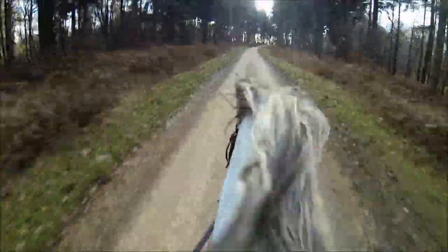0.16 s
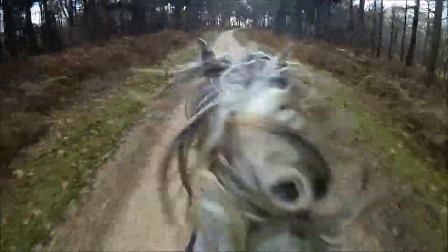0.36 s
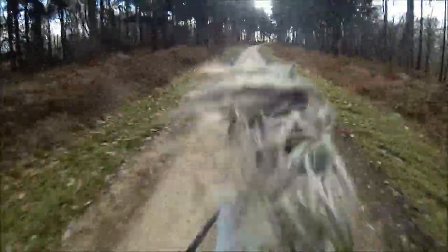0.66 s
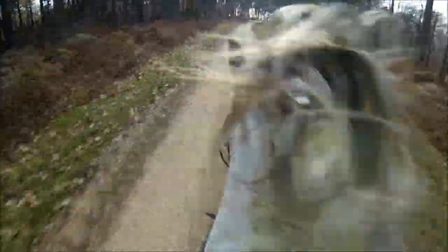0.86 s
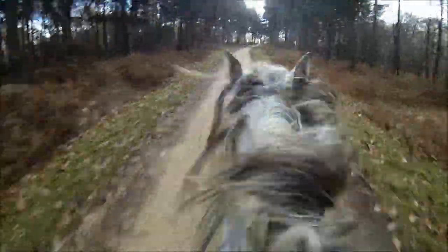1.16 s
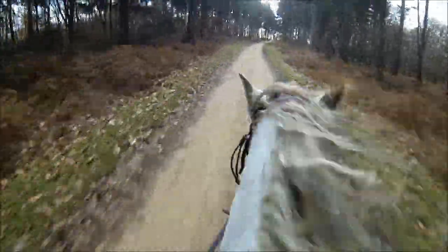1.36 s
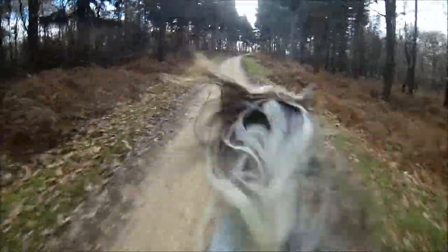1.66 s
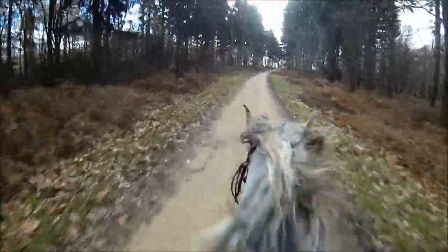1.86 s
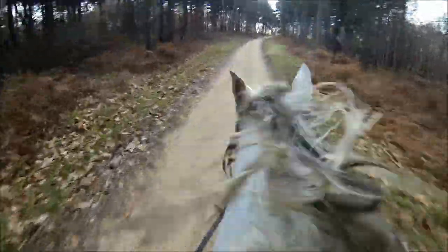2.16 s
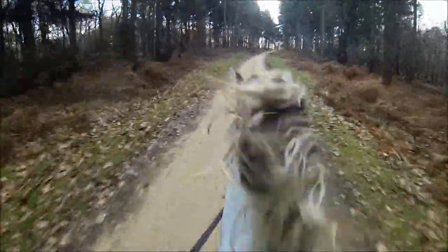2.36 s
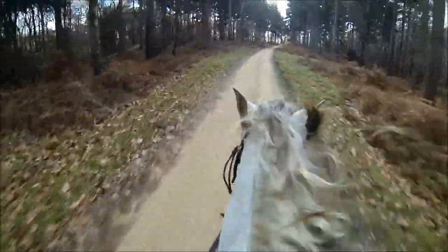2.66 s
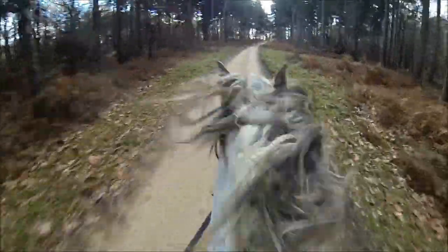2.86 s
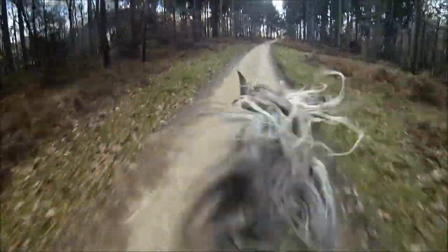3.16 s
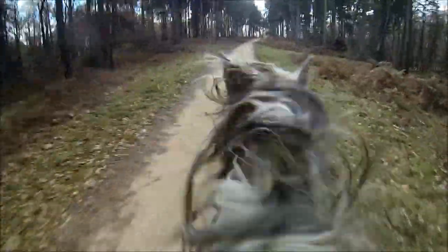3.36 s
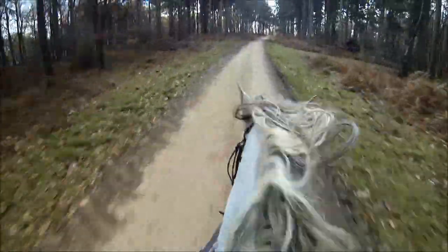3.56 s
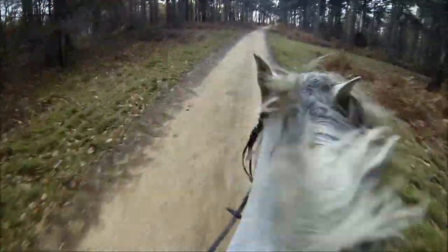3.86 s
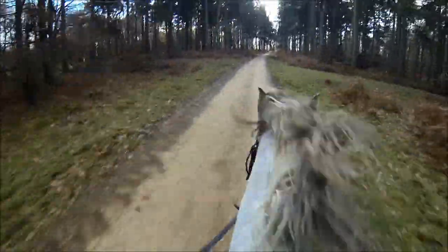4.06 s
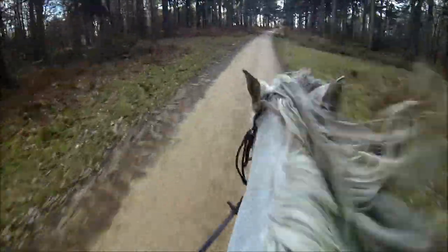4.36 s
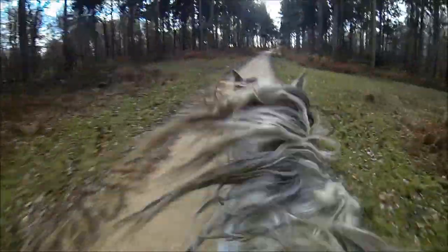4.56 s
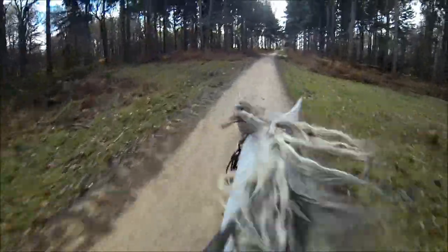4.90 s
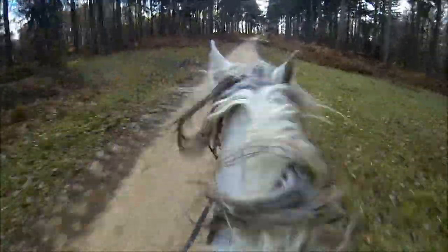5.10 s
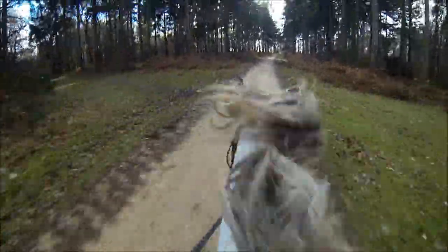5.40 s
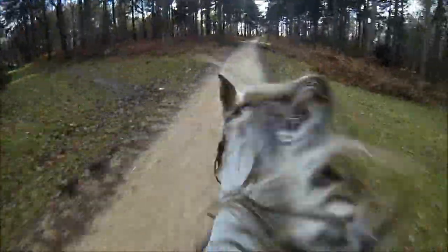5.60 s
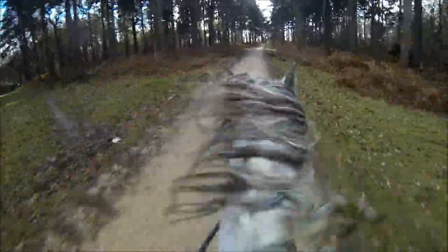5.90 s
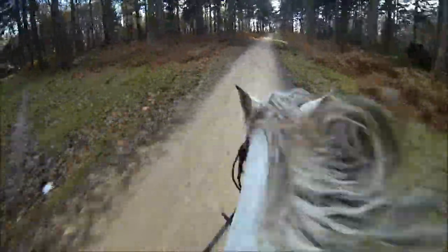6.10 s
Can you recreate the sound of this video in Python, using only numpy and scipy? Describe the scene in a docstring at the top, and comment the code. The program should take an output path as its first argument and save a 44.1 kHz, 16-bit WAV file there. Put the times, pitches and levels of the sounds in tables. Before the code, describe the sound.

From the saddle of a cantering horse on an open gravel forest track: about 2.3 strides a second, each with two softer scuffing hind hooves followed by two hard, dry fore clops. Stones crack and pebbles tick around them, tack clicks once per stride, and low wind rumble continually thumps the exposed microphone, rushing and hissing in gusts that swell with the rider's swing.

```python
"""On a gravel forest track, from the saddle of a cantering horse, about 2.3 strides a second, microphone in the wind.
From the start the wind buffets, rushes and hisses (shaped noise) over a faint floor, a pitched rattle and fine crackle.
Each stride below brings two scuffing hind hooves, then two hard fore clops (damped resonances with grit bursts).
As the first fore hoof lands a thump comes up through the saddle; the wind swells with the rider's swing, tack clicks.
Throughout, stones turn over, pebbles tick, and single gusts and eddies catch the microphone."""
import sys
import numpy as np
from scipy import signal
from scipy.fft import rfft, irfft, next_fast_len
from scipy.io import wavfile
from scipy.ndimage import uniform_filter1d

SR = 44100
rng = np.random.default_rng(int(sys.argv[2]) if len(sys.argv) > 2 else 0)


def dump_mix(stems):
    """Bounce the given channels to the path in sys.argv[1] as a 16-bit WAV at rate SR."""
    frames = np.atleast_2d(stems).T  # one column per channel
    limited = np.clip(frames, -1, 1)  # hard clip at full scale
    pcm = np.round(limited * 32767).astype(np.int16)
    wavfile.write(sys.argv[1], SR, pcm)


N = 275184
STEP = np.arange(4096) / SR  # time within one short sound (s)
CLOCK = np.arange(N) / SR  # time within the scene (s)

# Levels called "before trim" get a fixed offset in the function that plays them.
# Burst levels refer to the fixed span given to burst_one().

# steady airflow of the ride, before trim: (time [s], buffeting [dB], rush [dB], hiss [dB])
AIRFLOW = [(0.0, -18, -30, -43.5), (0.25, -20.5, -34, -45), (0.55, -20.5, -38.5, -67.5),
           (1.0, -12.5, -26.5, -39.5), (1.33, -17, -33, -47), (1.5, -20.5, -33.5, -52),
           (1.9, -17.5, -30, -49.5), (2.15, -17.5, -32.5, -47.5), (2.7, -17.5, -33, -49),
           (3.15, -15.5, -27, -42.5), (3.4, -18.5, -40.5, -54.5), (3.68, -23.5, -33, -48),
           (3.92, -19, -36.5, -56.5), (4.1, -36.5, -34, -55), (4.55, -17, -32.5, -49.5),
           (4.835, -18.5, -41, -59.5), (5.08, -24.5, -37.5, -57), (5.45, -19.5, -36, -55),
           (6.24, -22.5, -36.5, -57.5)]
# single gusts at the microphone, before trim and stretch:
# (crest time [s], length [s], buffeting [dB], rush [dB], hiss [dB])
GUSTS = [(0.067, 0.046, -10, -28, -51), (0.188, 0.073, -12, -29.5, -44), (0.351, 0.036, -8.5, -22.5, -35.5),
         (0.423, 0.057, -11.5, -22.5, -35), (0.571, 0.16, -12, -24.5, -37), (0.718, 0.031, -10, -20, -32),
         (0.785, 0.04, -14, -26.5, -32.5), (0.817, 0.021, -12, -17, -24.5), (0.83, 0.013, -6, -13, -18),
         (0.845, 0.035, -14, -26.5, -39), (0.881, 0.022, -16, -21, -30.5), (0.962, 0.043, -25, -19, -32.5),
         (1.067, 0.026, -8, -21.5, -39), (1.195, 0.011, -21, -20.5, -17), (1.205, 0.075, -10.5, -20, -32.5),
         (1.277, 0.029, -14, -28, -34.5), (1.341, 0.072, -28, -21, -37.5), (1.54, 0.037, -14.5, -37, -44),
         (1.618, 0.015, -34, -21.5, -37), (1.653, 0.018, -16.5, -49, -58), (1.76, 0.026, -12.5, -21, -30),
         (2.142, 0.03, -26, -37.5, -54), (2.217, 0.026, -12, -23, -33), (2.239, 0.033, -21, -20.5, -31.5),
         (2.372, 0.016, -13, -16.5, -38), (2.43, 0.037, -14.5, -29.5, -48), (2.522, 0.024, -19, -27.5, -59),
         (2.605, 0.042, -27, -24.5, -33.5), (2.664, 0.03, -14.5, -47, -60), (2.708, 0.051, -15.5, -35, -62),
         (2.896, 0.038, -32, -21, -40), (2.998, 0.078, -31, -26.5, -36.5), (3.067, 0.05, -15, -43, -53),
         (3.186, 0.041, -13, -36, -47), (3.267, 0.076, -12.5, -24.5, -36), (3.36, 0.079, -24, -29.5, -43),
         (3.453, 0.031, -10, -20.5, -34), (3.544, 0.081, -15, -27, -45), (3.803, 0.039, -17, -45, -56),
         (3.88, 0.047, -25, -27.5, -40), (3.964, 0.052, -16.5, -24.5, -40), (4.247, 0.063, -20.5, -38, -52),
         (4.319, 0.017, -18, -21, -34), (4.392, 0.01, -19, -23, -43), (4.688, 0.048, -29, -24.5, -39),
         (4.74, 0.078, -17.5, -24.5, -35), (4.976, 0.047, -21, -25, -39), (5.21, 0.04, -22, -30, -50),
         (5.232, 0.13, -19, -25.5, -36.5), (5.32, 0.056, -18, -29, -45), (5.479, 0.039, -10.5, -29.5, -36),
         (5.54, 0.071, -18, -28, -36), (5.624, 0.023, -21, -23, -35.5), (5.694, 0.052, -30, -25.5, -39.5),
         (5.734, .03, -13.5, -52, -57), (5.854, 0.065, -14, -43, -64), (6.073, 0.12, -17.5, -29.5, -37.5),
         (6.172, 0.031, -20, -24.5, -57)]
GUST_BUILD, GUST_BREAK = 0.89, 0.76  # factors on the length of a gust, for its rise and its fall
# dips of the buffeting: (time [s], length [s], depth [dB])
DROPS = [(0.264, .035, -9), (0.461, .03, -4), (0.675, 0.054, -7), (1.17, 0.038, -6), (1.303, 0.028, -2.5),
         (1.69, 0.016, -3), (1.736, .02, -9), (1.797, .03, -9), (1.924, 0.049, -12), (2.185, .03, -6),
         (2.406, 0.017, -2), (2.464, .03, -9), (2.533, .025, -1), (2.985, .025, -8), (3.04, .03, -8),
         (3.49, 0.027, -4), (3.72, .03, -3), (3.763, 0.025, -17), (3.842, .03, -2), (4.205, 0.025, -12),
         (4.5, .03, -7), (4.92, 0.036, -8), (5.11, 0.048, -2.5), (5.69, .025, -5), (5.811, 0.022, -4),
         (5.911, 0.05, -9)]
# change of the steady airflow at full swing of the rider: (buffeting [dB], rush [dB], hiss [dB])
SWING_DB = [0.3, 3, 6.5]
# change of the steady airflow in a full lull: (buffeting [dB], rush [dB], hiss [dB])
LULL_DB = [-2.5, -1.5, -6]
# lull before the first fore hoof lands, then before the second: (lead [s], length [s])
LULLS = [(0.048, 0.086), (0.044, 0.016)]
# spectra of the wind: (frequency [Hz], relative level per Hz [dB])
BUFFET_COLOUR = [(10, -7), (22, 2), (45, -0.5), (70, -4.5), (110, -11), (170, -20), (280, -33.5),
                 (600, -52), (1200, -90), (15000, -150)]
RUSH_COLOUR = [(60, -14.5), (120, 7.5), (200, 6), (300, 2.5), (420, 0.5), (600, -3), (880, -5),
               (1100, -15.5), (1600, -36.5), (3000, -59.5), (15000, -110)]
HISS_COLOUR = [(600, -2.5), (1100, 8), (1800, 4.5), (2100, -3.5), (2600, -6), (3600, -16), (4400, -21),
               (5200, -28), (6200, -38), (7500, -43), (9200, -49), (11000, -53), (15000, -68.5)]
# spectrum of the faint background hiss: (frequency [Hz], relative level per Hz [dB])
FLOOR_COLOUR = [(300, -0.5), (1200, 6), (2400, -2.5), (3700, -6), (4400, -14), (5200, -9.5), (6200, -23.5),
                (7600, -26), (9200, -23.5), (11000, -34), (15000, -53)]
# fine, bright crackle running throughout, slowly rising and falling, outside the swing: (time [s], level [dB])
FINE_CRACKLE = [(0, -65), (0.45, -60), (0.6, -55.5), (0.9, -63), (1.2, -56), (1.4, -64), (1.68, -63),
                (1.83, -60), (2.15, -62), (2.42, -59.5), (2.65, -62.5), (3.07, -60), (3.3, -62.5),
                (3.55, -62), (3.9, -68), (4.7, -66.5), (5.3, -69), (6.24, -71)]
# spectrum of that crackle, also of the hind spray: (frequency [Hz], relative level per Hz [dB])
BRIGHT_COLOUR = [(1000, -6), (2500, 7.5), (3600, 3.5), (4500, -5.5), (6000, -12.5), (7600, -18.5),
                 (9300, -18), (11000, -27), (12500, -22.5), (15500, -40)]
# spectrum of crunching stones: (frequency [Hz], relative level per Hz [dB])
CRUNCH_COLOUR = [(400, -5), (800, 1.5), (1200, 11), (2600, 1), (3500, -2.5), (4500, -15), (6000, -23),
                 (7600, -25.5), (9300, -22), (11000, -38.5), (15000, -50.5)]
# bigger stones turning over, burst levels:
# (time [s], thud level [dB], thud pitch [Hz], crack level [dB], crack pitch [Hz])
KNOCKS = [(0.054, -27.5, 445, -44, 1470), (0.397, -33, 406, -52, 1710), (0.62, -26, 760, -50, 1900),
          (0.703, -29, 620, -45, 1600), (0.868, -27, 490, -51, 1490), (0.876, -33.5, 730, -47, 1570),
          (0.9445, -19.5, 627, -42, 1650), (0.966, -15, 564, -46, 1770), (0.974, -21.5, 400, -35, 1570),
          (1.058, -33, 600, -39, 1410), (1.172, -31, 800, -46, 1800), (1.192, -29, 720, -34, 1590),
          (1.311, -33, 600, -35, 1630), (1.339, -24, 490, -47, 1490), (1.982, -28, 500, -44, 1650),
          (2.205, -30, 500, -49, 1300), (2.2335, -16.5, 316, -47, 1400), (2.38, -26, 530, -47, 1910),
          (2.399, -25.5, 660, -47, 1500), (2.426, -30, 600, -51, 1500), (2.538, -26, 500, -48, 1700),
          (2.705, -28, 440, -51, 1700), (2.786, -29, 804, -53, 1500), (2.899, -37, 600, -42, 1380),
          (2.994, -30.5, 695, -46, 1610), (3.244, -21.5, 560, -41, 2440), (3.281, -31, 470, -48, 1600),
          (3.511, -31, 530, -45, 1670), (3.858, -30.5, 360, -54, 1500), (3.874, -36, 600, -43, 1650),
          (3.952, -30, 450, -42, 1580), (4.3, -28.5, 613, -44, 1480), (4.324, -28, 480, -44, 1900),
          (4.379, -26, 425, -54, 1500), (4.665, -29, 500, -46, 1600), (4.696, -26.5, 500, -50, 1570),
          (4.75, -31, 530, -49, 1680), (5.008, -27.5, 560, -57, 1700), (5.172, -37, 600, -40, 1730),
          (5.233, -22, 497, -44, 1590), (5.565, -31, 444, -43, 1700), (6.081, -29.5, 470, -43, 1590),
          (6.093, -32, 610, -44, 1840), (6.11, -30, 580, -46, 1640)]
# single eddies popping on the microphone, ahead of its low cut:
# (crest time [s], pulse peak [dB], half-width at 1/e [s])
POPS = [(0.065, -20, 0.0041), (0.407, -10.5, 0.00075), (0.528, -3.5, 0.003), (0.579, -6, 0.0039),
        (1.046, -11, 0.006), (1.205, 0, 0.0019), (1.401, -6, 0.0048), (1.712, -5.5, 0.0021),
        (2.208, -3, 0.0011), (2.248, -14, 0.0024), (2.261, -4.5, 0.0043), (2.592, -6, 0.0039),
        (3.459, -6, 0.0031), (3.681, -12, 0.0048), (3.785, -14, 0.0035), (4.437, -10.5, 0.0065),
        (4.986, -2, 0.0018), (5.636, -4.5, 0.0023), (6.168, -7.5, 0.0046)]
# thin, bright ticks: (time [s], peak [dB])
TICKS = [(0.071, -51), (.3564, -47), (0.582, -43), (0.6, -45), (0.73, -41), (0.852, -43), (0.99, -53),
         (1.048, -39), (1.207, -40), (1.244, -52), (1.712, -42), (1.7544, -45), (2.209, -48), (2.589, -42),
         (2.9133, -43), (3.092, -47), (3.393, -55), (3.46, -38.5), (4.987, -37), (5.045, -40), (5.185, -52),
         (5.3135, -42), (5.616, -50), (5.6341, -43), (5.736, -46), (5.8474, -47)]
# spectrum of those ticks: (frequency [Hz], relative level per Hz [dB])
TICK_COLOUR = [(1500, -9), (3500, 4.5), (5500, 1), (7600, -6), (9300, -9), (11000, -21), (12500, -16),
               (15500, -47)]
# hind hooves, a pair just ahead of the fore pair, and a few stray knocks between; clop and scuff before trim:
# (time [s], clop level [dB], clop pitch [Hz], scuff level [dB], slide decay [s], crack of stone [dB])
HIND = [(0.086, -24, 660, -42, 0.0067, -41), (0.1539, -19, 520, -36, .006, -35),
        (0.259, -24.5, 574, -49, .006, -50), (0.517, -23, 696, -44, .012, -46),
        (0.587, -18.5, 770, -39, .012, -38), (0.9515, -23.5, 670, -39, 0.013, -42),
        (1.0206, -22.5, 750, -42.5, .006, -40), (1.3819, -22.5, 450, -45, 0.0087, -44),
        (1.452, -19, 518, -39, 0.0062, -40), (1.885, -21, 690, -42, .008, -42),
        (2.2484, -19.5, 393, -45, 0.0093, -45), (2.318, -23.5, 640, -38.5, .009, -36),
        (2.6781, -18.5, 765, -40.5, 0.015, -47), (2.7475, -21, 787, -34, 0.0075, -38),
        (3.109, -21.5, 800, -36.5, 0.01, -40.5), (3.183, -21, 684, -34, 0.0057, -43),
        (3.4152, -27.5, 830, -57, .006, -54), (3.55, -21.5, 655, -42, 0.0069, -44),
        (3.618, -20, 636, -38.5, 0.005, -44), (3.9787, -29, 625, -45, 0.011, -44),
        (4.0451, -26.5, 583, -38.5, 0.0093, -37), (4.392, -27, 530, -51, .008, -47),
        (4.411, -28.5, 725, -52, .005, -47), (4.42, -26.5, 590, -58, .008, -54),
        (4.4808, -22.5, 556, -35, 0.011, -38.5), (4.8492, -18.5, 520, -39, 0.0065, -36.5),
        (4.9187, -21, 680, -40, 0.01, -35), (5.2779, -21, 525, -45, .008, -46),
        (5.3512, -23.5, 670, -44, .007, -44), (5.7153, -21.5, 517, -41.5, .008, -43),
        (5.792, -23, 665, -38, 0.0081, -36), (6.1603, -27.5, 610, -42, 0.0087, -51),
        (6.2345, -26, 674, -40, .008, -38) ]
# spectrum of the hind scuff: (frequency [Hz], relative level per Hz [dB])
SCUFF_COLOUR = [(500, -15), (1200, 5.5), (1800, -0.5), (2600, -0.5), (3400, -9), (4200, -24), (5500, -28.5),
                (7600, -44.5), (9300, -38.5), (11000, -50.5), (15500, -62)]
# fore hooves, two a stride, burst levels; heel strike also sets its grit, snap before trim:
# (time [s], clop level [dB], clop pitch [Hz], clop decay [s], heel lead [s], heel strike [dB], stone level [dB],
#  stone pitch [Hz], snap of grit [dB], shoe level [dB], shoe pitch [Hz], crunch level [dB])
FORE = [(0.206, -15.5, 420, 0.00081, 0.00098, -16, -34, 2200, -39.5, -49, 3900, -38.5),
        (0.2869, -11.5, 348, .00025, 0.00075, -14, -46, 2740, -38.5, -50, 4200, -44),
        (0.6348, -12, 500, 0.00052, 0.0022, -13, -40, 2320, -36.5, -45, 3330, -44),
        (0.7164, -14, 387, 0.0011, 0.00028, -12, -31, 1800, -45, -42, 3600, -41),
        (1.0715, -15.5, 637, 0.00041, 0.0021, -20, -37, 2460, -37, -43, 3380, -40),
        (1.153, -13.5, 370, 0.00076, 0.002, -18, -27, 1800, -39, -48, 2520, -41),
        (1.5025, -8.5, 488, .00079, .0017, -15.5, -26.5, 1810, -40.5, -44, 2410, -42),
        (1.5834, -11.5, 360, 0.00041, 0.00068, -38, -20.5, 1440, -37.5, -30.5, 2700, -44),
        (1.9324, -11.5, 470, 0.0007, 0.0013, -14.5, -30, 1260, -35.5, -61, 3700, -39),
        (2.0151, -10.5, 496, .00071, 0.0011, -25, -24.5, 1290, -39.5, -34.5, 2490, -46),
        (2.3654, -12.5, 730, 0.00054, 0.001, -20.5, -33, 2070, -34.5, -34.5, 2740, -36),
        (2.4469, -10.5, 613, 0.00066, 0.0015, -25, -30.5, 1890, -41, -48, 2500, -54),
        (2.7926, -10, 692, 0.00069, .00053, -19.5, -43, 2700, -38, -38.5, 3500, -39.5),
        (2.874, -11, 597, 0.00053, .0022, -28, -32, 2030, -36, -45, 3400, -40),
        (3.231, -10.5, 430, 0.00059, 0.00046, -12.5, -41, 1810, -46, -40, 3200, -42),
        (3.3141, -11.5, 540, .00048, 0.00098, -14.5, -36, 1900, -39, -39, 2800, -54),
        (3.6578, -11, 620, 0.0004, .0023, -28, -27, 1710, -35, -47, 2820, -45),
        (3.7427, -11.5, 553, 0.00053, 0.0008, -18.8, -24, 1300, -42, -40, 2390, -39.5),
        (4.093, -9.5, 667, 0.0008, 0.001376, -32, -40, 2320, -37, -40.5, 3070, -45),
        (4.176, -8, 538, .00053, .0021, -27.5, -29, 1510, -41, -47, 2190, -49),
        (4.5327, -11.5, 350, .00066, 0.00035, -13.5, -35.5, 1950, -41, -47, 3050, -45),
        (4.6139, -11.5, 560, 0.00042, 0.0023, -22.5, -42, 2520, -39.5, -46.5, 3500, -43),
        (4.9555, -10.5, 430, 0.00042, 0.00055, -18, -26.5, 1600, -49, -26.5, 2580, -39),
        (5.0435, -8, 538, 0.00058, .0025, -22.5, -27, 1450, -53, -38, 1710, -57),
        (5.3973, -10.5, 585, 0.00049, .0021, -19.5, -37, 2430, -36.5, -39.5, 3450, -53),
        (5.482, -10, 597, 0.00051, .0015, -31, -25.5, 1530, -33, -50, 3100, -48),
        (5.8341, -8.5, 582, 0.0006, .0029, -38, -27.5, 1610, -40.5, -35, 2600, -48),
        (5.9204, -7.5, 533, 0.00067, .0027, -22.5, -26.5, 1800, -40.5, -54, 2860, -48)]
# spectrum of grit snapping under a fore hoof: (frequency [Hz], relative level per Hz [dB])
SNAP_COLOUR = [(500, -29), (1500, -2), (2200, -1), (2700, 1), (3500, -6.5), (4200, -12), (5500, -20.5),
               (7600, -27), (9300, -26.5), (11000, -41.5), (12800, -40), (15500, -56)]
# short dry clicks: buckles and bit, and a few ticks on wind pops; before trim and a 1.3 ms delay:
# (time [s], peak [dB])
DRY_CLICKS = [(0.373, -19), (1.231, -19), (1.667, -22.5), (2.105, -19.5), (2.5311, -20), (2.544, -17.5),
              (2.958, -20), (3.265, -22), (3.393, -19.5), (3.458, -36), (3.83, -21.5), (4.266, -18.5),
              (4.693, -22.5), (4.984, -28), (5.0095, -33), (5.135, -24), (5.5667, -22), (5.617, -28.5),
              (6.004, -24)]
# spectrum of the dry clicks, also of the tick on an eddy: (frequency [Hz], relative level per Hz [dB])
CLICK_COLOUR = [(700, -25.5), (1600, 17.5), (2500, 11.5), (3500, 10), (4500, -8), (6000, -19.5),
                (7600, -28), (9200, -29.5), (14000, -35)]

STRIDE_S = 0.43  # places the swings before the first and after the last stride
# the swing, counted from the landing of each first fore hoof
SWING_DELAY_S, SWING_ATTACK_S, SWING_HOLD_S, SWING_RELEASE_S = 0.062, 0.054, 0.083, 0.031
SLACK_DELAY_S, SLACK_LENGTH_S = 0.033, 0.008  # one more lull as the horse leaves the ground
FLUTTER_HZ, FLUTTER_DB = 12.3, [2.1, 2.1, 2]  # chance unsteadiness: rate, spread of (buffeting, rush, hiss)
FLOOR_DB, FLOOR_SWING_DB = -58, -4  # background hiss, its change in the swing
RATTLE_DB, RATTLE_PER_S = -10, 190  # pitched rattle: level against the untrimmed wind hiss, clicks per second
RATTLE_HZ, RATTLE_CYCLES = (880, 3600), 11  # range of pitches, cycles to ring down by 60 dB
RATTLE_TILT_DB = -8.5  # change of gain per octave of pitch
SCATTER_PER_S, SCATTER_DB, SCATTER_SWING_DB = 110, -75.5, 5.5  # falling stones: rate, level, gain in the swing
THUD_DECAY_S, CRACK_DECAY_S = 0.00076, 0.0005  # the two parts of a turning stone
TOE_DELAY_S, TOE_DB = 0.008, -10.5  # hind toe: mean wait after the heel, level against the clop
HIND_CRUNCH_DB = -56.5  # gravel shifting under a hind hoof
HIND_SPRAY_DB, HIND_SPRAY_DELAY_S = -14.5, 0.0025  # bright grit, against the untrimmed scuff
PEBBLE_HZ, PEBBLE_CYCLES = (735, 3500), 1.3  # range of pitches, decay time in cycles
PEBBLE_DB, PEBBLE_SPREAD_DB = -49.5, 14  # smallest knock at the lowest pitch, range of sizes above it
PEBBLE_DELAY_S = 0.039  # mean wait after the hoof
HEEL_HZ, HEEL_DECAY_S = 667, 0.00039  # the fore heel's short tap, just ahead of the sole
STONE_DECAY_S, SHOE_DECAY_S = 0.00051, 0.0006  # stone under the shoe; iron shoe, damped by the hoof
JOLT_DELAY_S, JOLT_WIDTH_S, JOLT_DB = 0.01, 0.0068, -19.5  # crest, half-width at 1/e, mean peak before low cut
CHATTER_DB = -3.5  # chatter of a dry click against its first snap, before colouring
LOW_CUT_HZ = 9.7
CUTOFF_HZ = 15900  # from here up everything is at least 70 dB down


def from_db(db):
    """Decibels to gain."""
    return 10 ** (np.asarray(db) / 20)


def rms_one(x):
    """Scale to rms 1."""
    return x / np.sqrt(np.mean(x ** 2) + 1e-20)


def burst_one(x, seconds):
    """Scale a burst to the energy of rms 1 held for so many seconds."""
    return x * np.sqrt(seconds * SR / (np.sum(x ** 2) + 1e-20))


def levelled(x, size):
    """Hold a noise near rms 1 over spans of so many samples; its faster flutter stays."""
    x = rms_one(x)
    power = uniform_filter1d(uniform_filter1d(x ** 2, size=size), size=size)
    return x / np.sqrt(power + 0.025)


def in_time(rows):
    """The columns of a curve at every sample."""
    s, *columns = np.transpose(rows)
    return [np.interp(CLOCK, s, c) for c in columns]


def add(out, s, sound):
    """Mix a sound in at a time."""
    at = max(0, round(s * SR))
    part = out[at:at + len(sound)]
    part += sound[:len(part)]


def colour(x, spectrum):
    """Causal (minimum-phase) filter with the given spectrum."""
    size = 2 * next_fast_len(len(x))
    hz, db = np.transpose(spectrum)
    grid = np.maximum(np.arange(size // 2 + 1) * SR / size, 1)
    gain = from_db(np.interp(np.log(grid), np.log(hz), db))
    # folding the cepstrum onto positive time gives minimum phase
    cepstrum = irfft(np.log(gain))
    cepstrum[1:size // 2] *= 2
    cepstrum[size // 2 + 1:] = 0
    return irfft(rfft(x, size) * np.exp(rfft(cepstrum)))[:len(x)]


def drift(rate):
    """Smooth chance with spread 1, at a rate in Hz."""
    r = np.exp(-2 * np.pi * rate / SR)
    noise = rng.standard_normal(N + SR)
    return rms_one(signal.lfilter([1], [1, -2 * r, r * r], noise)[SR:])


def clicks_of(length, per_s, spread_db):
    """Random clicks of uneven size over so many samples."""
    sizes = from_db(spread_db * np.minimum(rng.exponential(1, length), 4))
    return sizes * rng.standard_normal(length) * (rng.random(length) < per_s / SR)


def crackle(per_s, spread_db):
    """Clicks over the whole scene."""
    return clicks_of(N, per_s, spread_db)


def grains(per_s, spread_db):
    """Clicks over one short sound."""
    return clicks_of(len(STEP), per_s, spread_db)


def bump(s, length):
    """A smooth rise and fall around a moment, height 1; the length is its full width at 1/e."""
    return np.exp(-np.minimum((2 * (CLOCK - s) / length) ** 2, 50))


def swell(start, rise, decay):
    """An envelope that rises after its start and dies away."""
    t = np.maximum(STEP - start, 0)
    return (1 - np.exp(-t / rise)) * np.exp(-t / decay)


def knock(start, hz, rise, decay):
    """A heavily damped resonance, set going by a contact of finite length."""
    return swell(start, rise, decay) * np.sin(2 * np.pi * hz * (STEP - start))


def slap(start, hz, decay):
    """A resonance squeezed by a yielding contact: its envelope builds as time squared, then is quickly damped."""
    t = np.maximum(STEP - start, 0)
    envelope = t ** 2 * np.exp(-t / decay) / decay ** 2
    return burst_one(envelope * np.sin(2 * np.pi * hz * t), 0.0066)


def stride():
    """The rider's forward swing (0-1) and the lulls around the fore landings, in step with the hooves."""
    first = [row[0] for row in FORE[::2]]
    second = [row[0] for row in FORE[1::2]]
    landings = [FORE[0][0] - STRIDE_S] + first + [FORE[-2][0] + STRIDE_S]
    corners = np.cumsum([SWING_DELAY_S, SWING_ATTACK_S, SWING_HOLD_S, SWING_RELEASE_S])
    swing = sum(np.interp(CLOCK, s + corners, [0, 1, 1, 0]) for s in landings)
    lull = sum(bump(s + SLACK_DELAY_S, SLACK_LENGTH_S) for s in second)
    for times, (lead, length) in zip((landings, second), LULLS):
        lull = lull + sum(bump(s - lead, length) for s in times)
    return swing, lull


def air_levels(swing, lull):
    """Gains of buffeting, rush and hiss: airflow heaves with the stride; the power of single gusts adds on top."""
    steady_db = np.array(in_time(AIRFLOW)) + np.outer(SWING_DB, swing) + np.outer(LULL_DB, lull)
    power = from_db(steady_db) ** 2
    for s, length, *gust_db in GUSTS:
        stretch = np.where(CLOCK < s, GUST_BUILD, GUST_BREAK)
        power += np.outer(from_db(gust_db) ** 2, bump(s, length * stretch))
    return np.sqrt(power) * from_db(np.outer(FLUTTER_DB, drift(FLUTTER_HZ)))


def wind(gains, buffet_trim_db, rush_trim_db, hiss_trim_db):
    """Eddies thump on the microphone port; small fast ones make rush and crackling hiss flutter together."""
    buffet_gain, rush_gain, hiss_gain = gains
    lumps = levelled(colour(rng.standard_normal(N), BUFFET_COLOUR), size=1100)
    # the flow tears off hardest on the pressure crests of the big eddies
    eddies = drift(120) + 0.4 * lumps
    torn_noise = rng.standard_normal(N) * from_db(3.44 * eddies)
    rush = levelled(colour(torn_noise, RUSH_COLOUR), size=1100)
    torn_clicks = crackle(per_s=3200, spread_db=-0.5) * from_db(1.6 * eddies)
    hiss = levelled(colour(torn_clicks, HISS_COLOUR), size=1100)
    drop_db = sum(depth_db * bump(s, length) for s, length, depth_db in DROPS)
    air = from_db(buffet_trim_db + drop_db) * buffet_gain * lumps
    air += from_db(rush_trim_db) * rush_gain * rush
    return air + from_db(hiss_trim_db) * hiss_gain * hiss


def background(swing):
    """A faint steady noise behind everything, dipping with the swing."""
    hiss = rms_one(colour(rng.standard_normal(N), FLOOR_COLOUR))
    return from_db(FLOOR_DB + FLOOR_SWING_DB * swing) * hiss


def rattle(clump_db, count):
    """A pitched rattle in clumps: clicks dealt out among resonators, each ringing at its own pitch. Rms 1."""
    clumps = from_db(clump_db * np.clip(drift(35), -2, 1))
    clicks = crackle(per_s=RATTLE_PER_S, spread_db=4.0) * clumps
    dealt = rng.integers(0, count, N)
    out = np.zeros(N)
    for k, hz in enumerate(np.geomspace(*RATTLE_HZ, count)):
        r = from_db(-60 * hz / (RATTLE_CYCLES * SR))
        w = 2 * np.pi * hz / SR
        struck = clicks * (dealt == k) + 1e-18
        ring = signal.lfilter([1, 0, -1], [1, -2 * r * np.cos(w), r * r], struck)
        out += from_db(RATTLE_TILT_DB * np.log2(hz / RATTLE_HZ[0])) * ring
    low_pass = signal.butter(4, RATTLE_HZ[1], fs=SR, output="sos")
    return rms_one(signal.sosfilt(low_pass, out))


def fine_crackle(swing, swing_db, clump_db):
    """A dense, bright crackle in ragged clumps, slowly rising and falling, a touch louder in the swing."""
    level_db, = in_time(FINE_CRACKLE)
    clumps = from_db(clump_db * np.clip(drift(25), -2, 2))
    bright = rms_one(colour(crackle(per_s=3000, spread_db=-2.0) * clumps, BRIGHT_COLOUR))
    return from_db(level_db + swing_db * swing) * bright


def scatter(swing):
    """Kicked-up stones tick as they fall back: sparse coloured clicks, louder in the swing."""
    falling = crackle(per_s=SCATTER_PER_S, spread_db=4.0) * from_db(SCATTER_SWING_DB * swing)
    return from_db(SCATTER_DB) * rms_one(colour(falling, CRUNCH_COLOUR))


def knocks():
    """A stone turns over in the track: two damped resonances, a throaty thud and a small crack."""
    out = np.zeros(N)
    for s, thud_db, thud_hz, crack_db, crack_hz in KNOCKS:
        thud = from_db(thud_db) * slap(0, thud_hz, THUD_DECAY_S)
        crack = from_db(crack_db) * slap(0, crack_hz, CRACK_DECAY_S)
        add(out, s, thud + crack)
    return out


def pops(edge_db):
    """A lone eddy tugs at the diaphragm: one blunt pulse with a faint tick at its crest."""
    out = np.zeros(N)
    for s, peak_db, width in POPS:
        crest = 3 * width
        pulse = -np.exp(-((STEP - crest) / width) ** 2)
        specks = grains(12000, 1.8) * swell(crest, 0.0002, 0.001)
        tick = burst_one(colour(specks, CLICK_COLOUR), 0.0011)
        add(out, s - crest, from_db(peak_db) * (pulse + from_db(edge_db) * tick))
    return out


def ticks():
    """Thin ticks, like specks of grit hitting something hard close by: very short bursts of clicks."""
    out = np.zeros(N)
    for s, peak_db in TICKS:
        tick = colour(grains(14000, 2.5) * swell(0, 0.0002, 0.0009), TICK_COLOUR)
        add(out, s, from_db(peak_db) * tick / np.abs(tick).max())
    return out


def gravel(land, spectrum, snap_db, snap_decay, crunch_db, crunch_rise, crunch_decay):
    """Stones snap under the shoe, then shift and crunch as the weight comes on."""
    snap = grains(12000, 2.2) * swell(land, 0.00041, snap_decay)
    crunch = grains(1100, 1.2) * swell(land, crunch_rise, crunch_decay)
    return (from_db(snap_db) * burst_one(colour(snap, spectrum), 0.005)
            + from_db(crunch_db) * burst_one(colour(crunch, CRUNCH_COLOUR), 0.016))


def stone(land, hz, decay):
    """The shoe meets a pebble: a short tock, at another pitch every time."""
    pitch = hz * 2 ** (0.29 * np.clip(rng.standard_normal(), -1.5, 2))
    return burst_one(knock(land, pitch, 0.000082, decay), 0.0071)


def hind_hooves(clop_trim_db, snap_trim_db):
    """Hind hooves slide in flat: a crack of stone, a soft double knock of heel and toe, a scuff; strays alike."""
    ring_hz, ring_db, thud_hz, thud_db = 747, -16, 276, -7.5  # mean values, against the clop
    out = np.zeros(N)
    for s, clop_db, hz, scuff_db, slide, crack_db in HIND:
        chance = np.clip(rng.standard_normal(5), -2, 2)
        ring = knock(0, ring_hz * (1 + 0.099 * chance[1]), 0.00046, 0.0058)
        thud = knock(0, thud_hz * (1 + 0.32 * chance[2]), 0.0038, 0.0044)
        clop = knock(0, hz, 0.0016, 0.0023)
        clop += from_db(ring_db + 2 * chance[0]) * ring + from_db(thud_db) * thud
        toe = slap(TOE_DELAY_S * (1 + 0.23 * chance[3]), hz * (1 + 0.2 * chance[4]), 0.0014)
        step = from_db(clop_db + clop_trim_db) * (burst_one(clop, 0.0061) + from_db(TOE_DB) * toe)
        step += gravel(0, SCUFF_COLOUR, scuff_db + snap_trim_db, slide,
                       HIND_CRUNCH_DB, crunch_rise=0.0031, crunch_decay=0.0091)
        # bright grit thrown by the sliding hoof
        spray = colour(grains(3000, 1.5) * swell(HIND_SPRAY_DELAY_S, 0.0037, slide), BRIGHT_COLOUR)
        step += from_db(scuff_db + HIND_SPRAY_DB) * burst_one(spray, 0.0074)
        step += from_db(crack_db) * stone(0, hz=1620, decay=0.002)
        add(out, s, step)
    return out


def pebbles(count):
    """Every hoof or stray knock sets off a few pebbles: a clump of small clicks, each with its own pitch."""
    out = np.zeros(N)
    low, high = PEBBLE_HZ
    for s, *_ in FORE + HIND:
        for wait, pitch, size in rng.random((count, 3)):
            hz = low * (high / low) ** pitch
            level = from_db(PEBBLE_DB + PEBBLE_SPREAD_DB * size) * low / hz
            click = burst_one(knock(0, hz, 0.0001, PEBBLE_CYCLES / hz), 0.0094)
            add(out, s - PEBBLE_DELAY_S * np.log(1 - wait), level * click)
    return out


def fore_hooves(snap_trim_db):
    """The heel taps, then the hollow sole slaps down on a pocket of air and the shoe clinks against a stone."""
    ring_hz, ring_db, thud_hz, thud_db = 670, -16.5, 179, -14.5  # mean values, against the clop
    out = np.zeros(N)
    for (s, clop_db, hz, decay, lead, heel_db, stone_db, stone_hz,
         snap_db, shoe_db, shoe_hz, crunch_db) in FORE:
        chance = np.clip(rng.standard_normal(4), -1.5, 1.5)
        step = from_db(heel_db) * slap(0, HEEL_HZ, HEEL_DECAY_S)
        step += from_db(clop_db) * slap(lead, hz, decay)
        step += from_db(stone_db) * slap(lead, stone_hz, STONE_DECAY_S)
        step += from_db(shoe_db) * slap(lead, shoe_hz, SHOE_DECAY_S)
        # the hoof capsule rings on faintly, the ground gives a dull thud of opposite sign
        ring = knock(lead + 0.00095, ring_hz * (1 + 0.23 * chance[0]), 0.0085, 0.0036)
        thud = knock(lead, thud_hz * (1 + 0.28 * chance[1]), 0.0018, 0.0058)
        step += from_db(clop_db + ring_db + 2 * chance[2]) * burst_one(ring, 0.0078)
        step -= from_db(clop_db + thud_db + 2 * chance[3]) * burst_one(thud, 0.0061)
        heel_grit = colour(grains(13000, 0.89) * swell(0, 0.0001, 0.00021), SNAP_COLOUR)
        step += from_db(heel_db - 26.5) * burst_one(heel_grit, 0.004)
        step += gravel(lead, SNAP_COLOUR, snap_db + snap_trim_db, 0.0021,
                       crunch_db, crunch_rise=0.011, crunch_decay=0.0079)
        add(out, s - lead, step)
    return out


def jolts():
    """The first fore hoof of a stride takes the weight: a soft, deep pulse comes up through the saddle."""
    out = np.zeros(N)
    for s, *_ in FORE[::2]:
        size = from_db(JOLT_DB + 2.7 * rng.standard_normal())
        add(out, s, -size * np.exp(-((STEP - JOLT_DELAY_S) / JOLT_WIDTH_S) ** 2))
    return out


def dry_clicks(trim_db):
    """Short dry clicks of buckles and bit, a few on wind pops: one snap with a little chatter behind it."""
    out = np.zeros(N)
    for s, peak_db in DRY_CLICKS:
        chatter = grains(8700, 1.9) * swell(0, 0.000093, 0.002)
        chatter = from_db(CHATTER_DB) * chatter / np.linalg.norm(chatter)
        click = colour(signal.unit_impulse(len(STEP)) + chatter, CLICK_COLOUR)
        add(out, s + 0.0013, from_db(peak_db + trim_db) * click / np.abs(click).max())
    return out


def scene():
    """Hooves, stones and tack below the rider, wind at the microphone, a faint hiss behind."""
    swing, lull = stride()
    gains = air_levels(swing, lull)
    air = wind(gains, buffet_trim_db=-1.6, rush_trim_db=0.74, hiss_trim_db=-4)
    # the pitched rattle rises and falls with the wind's hiss, gusts included
    track = from_db(RATTLE_DB) * gains[2] * rattle(clump_db=2.0, count=18)
    track += fine_crackle(swing, swing_db=0.5, clump_db=5.0) + scatter(swing) + knocks() + ticks()
    horse = hind_hooves(clop_trim_db=3.5, snap_trim_db=3.5) + pebbles(count=4)
    horse += fore_hooves(snap_trim_db=2.0) + dry_clicks(trim_db=-5.0)
    # the microphone passes no steady pressure, so each thump rebounds
    low_cut = signal.butter(1, LOW_CUT_HZ, "high", fs=SR, output="sos")
    thumps = signal.sosfilt(low_cut, pops(edge_db=-38.0) + jolts())
    return (air + background(swing) + track + horse + thumps)[None]


def record(dry):
    """The highest peaks are rounded off and the top is cut."""
    rounded = dry / (1 + dry ** 8) ** (1 / 8)
    return signal.sosfilt(signal.cheby2(12, 70, CUTOFF_HZ, fs=SR, output="sos"), rounded)


dry = scene()
out = record(dry)
dump_mix(out)
```